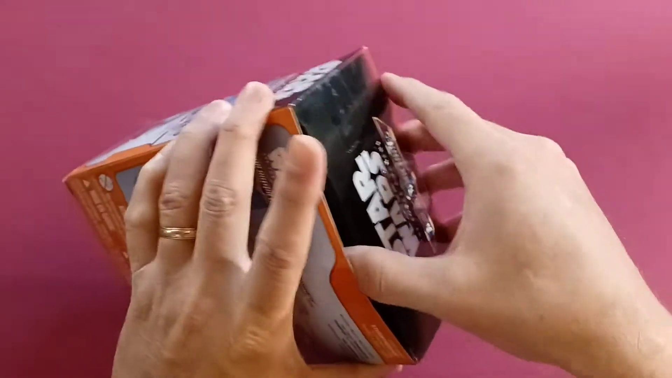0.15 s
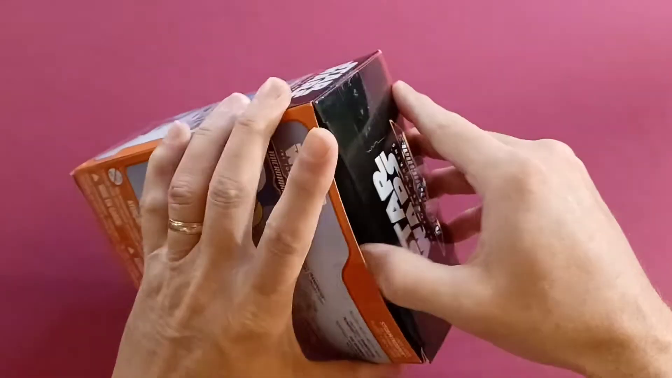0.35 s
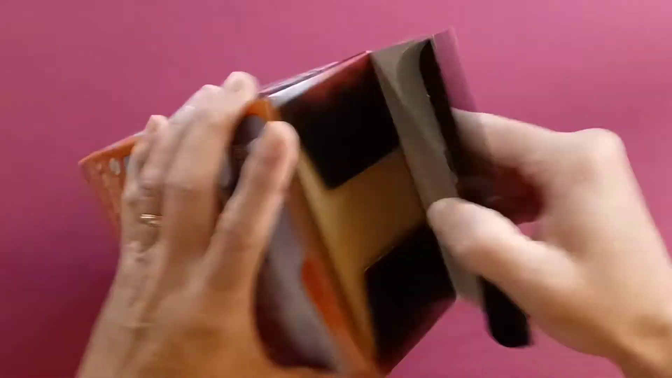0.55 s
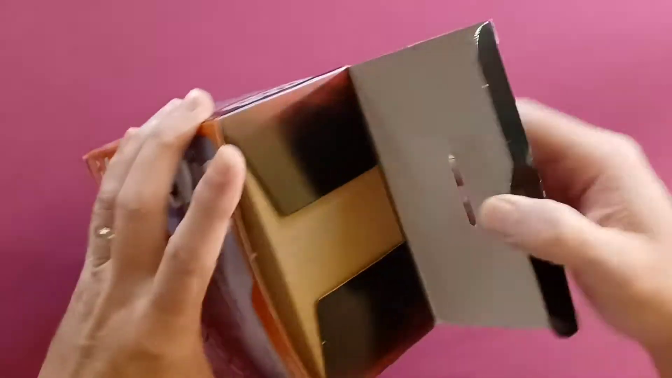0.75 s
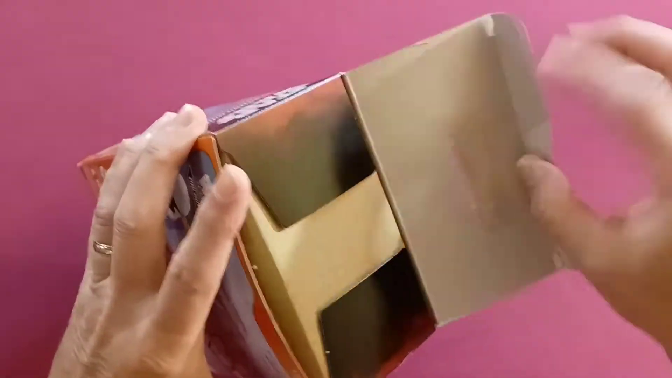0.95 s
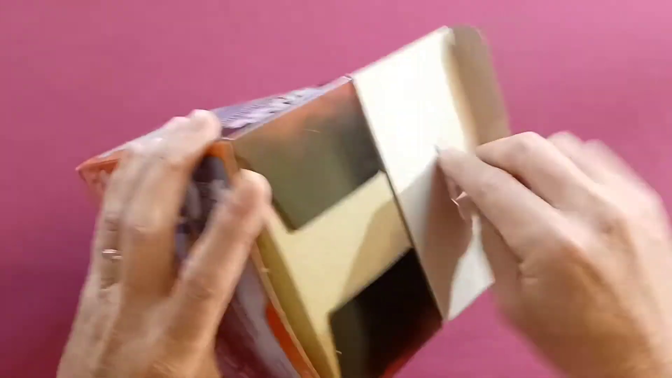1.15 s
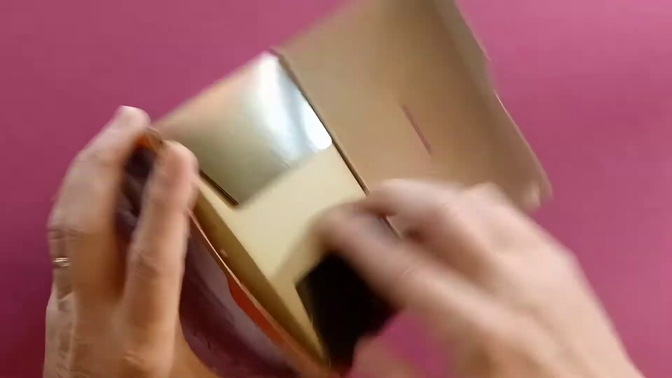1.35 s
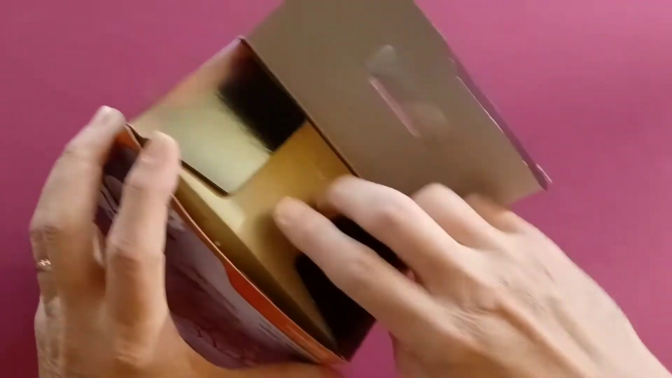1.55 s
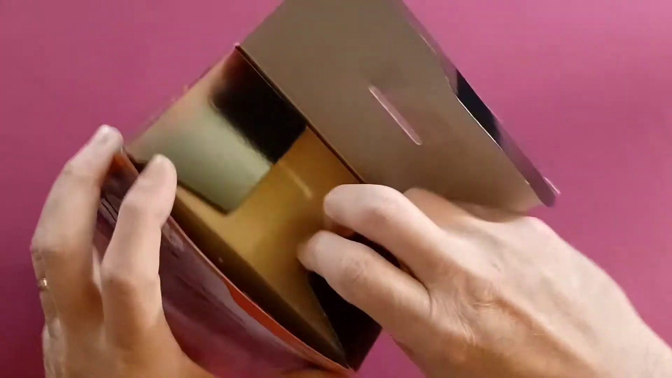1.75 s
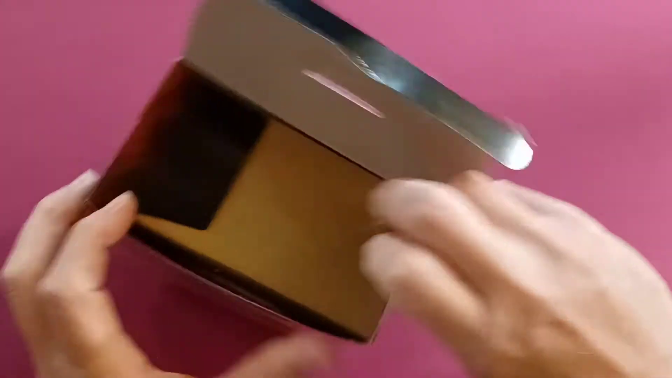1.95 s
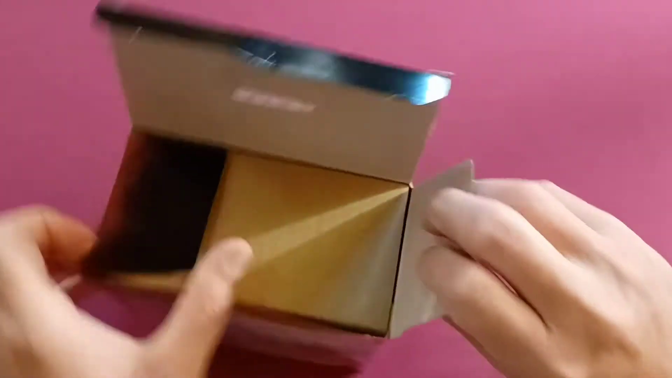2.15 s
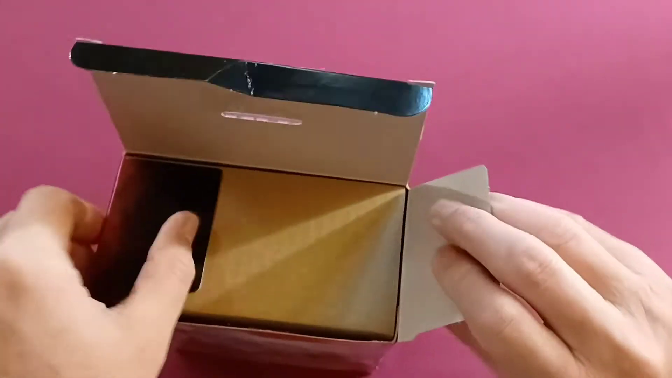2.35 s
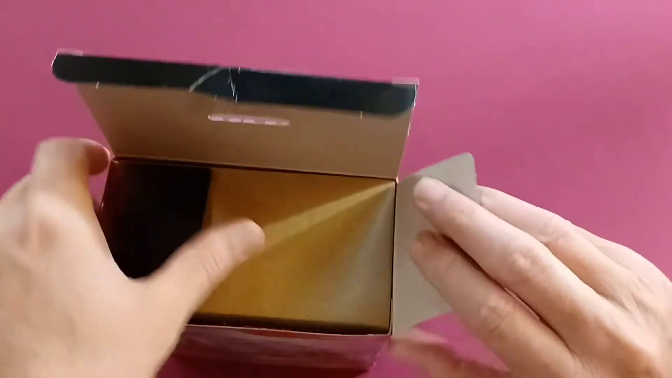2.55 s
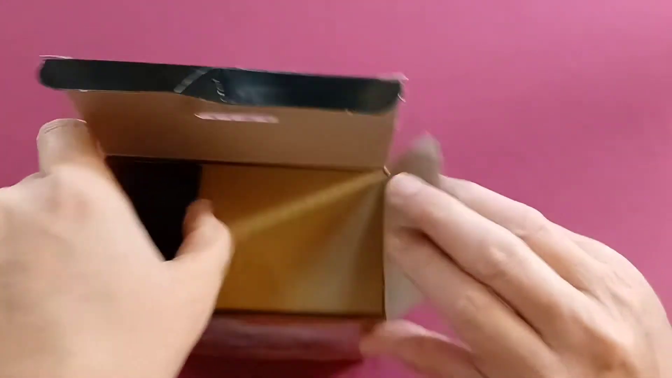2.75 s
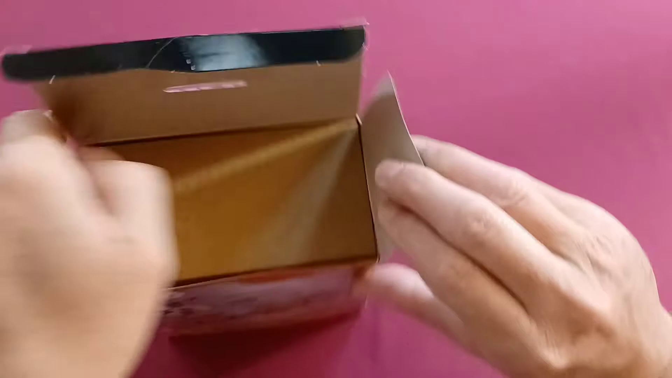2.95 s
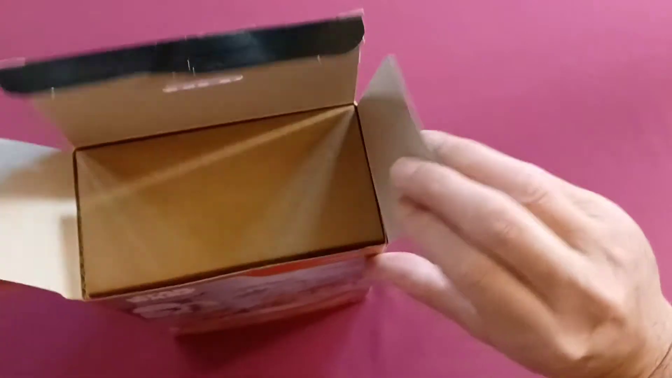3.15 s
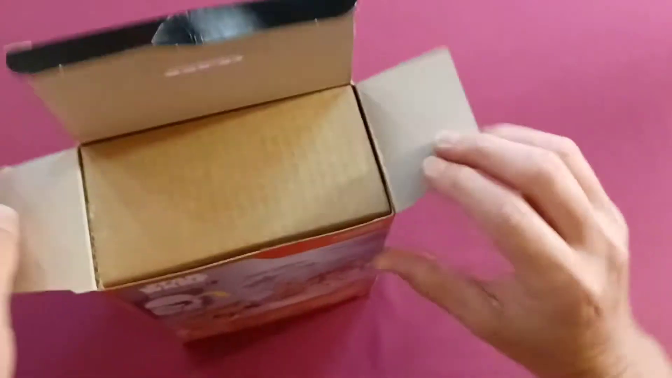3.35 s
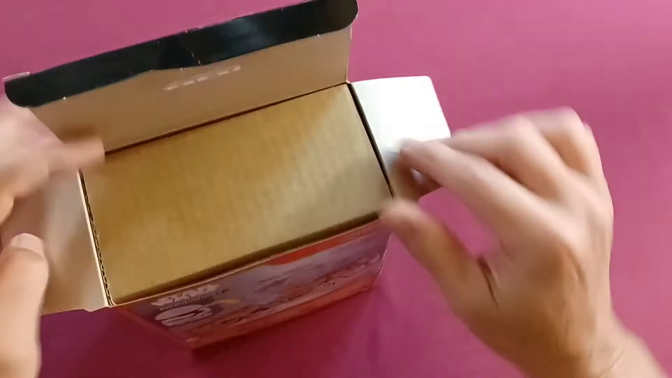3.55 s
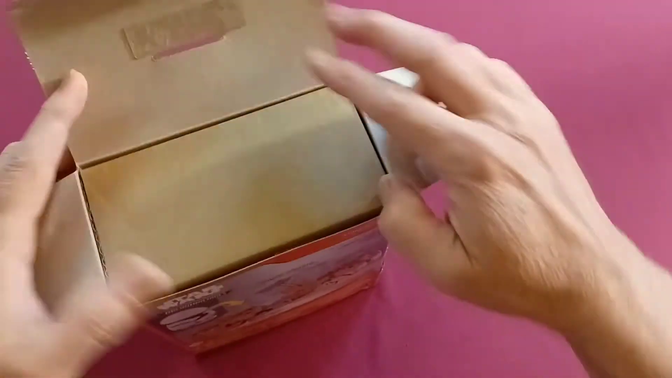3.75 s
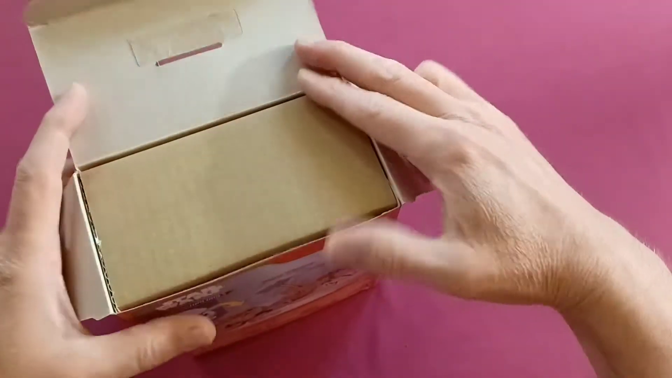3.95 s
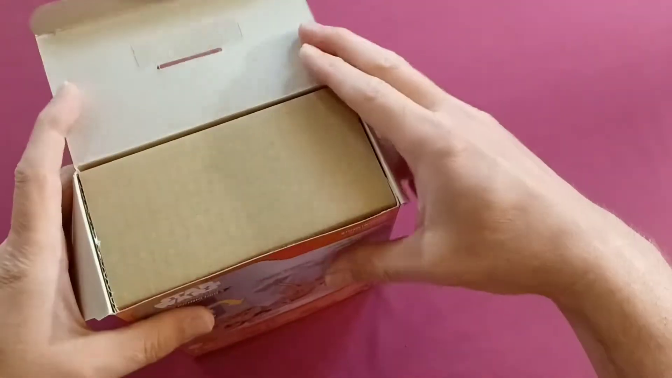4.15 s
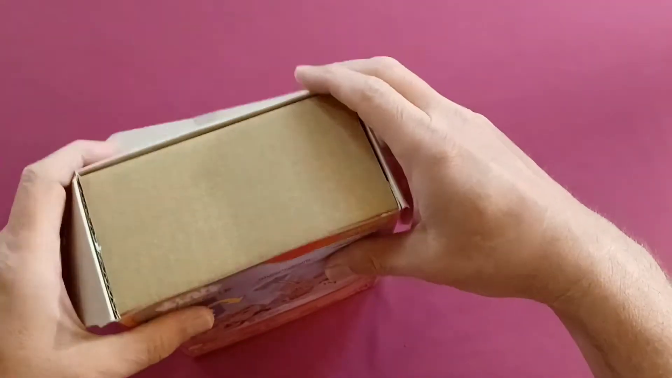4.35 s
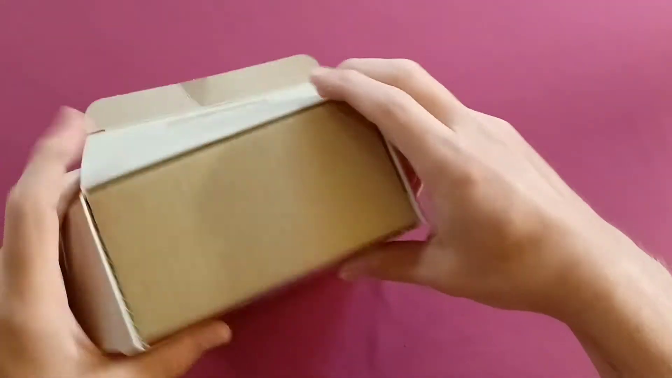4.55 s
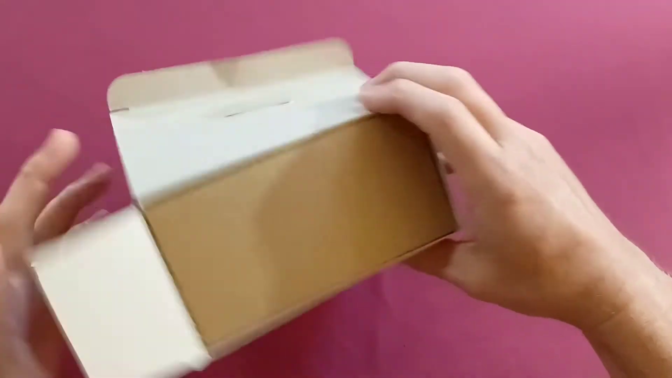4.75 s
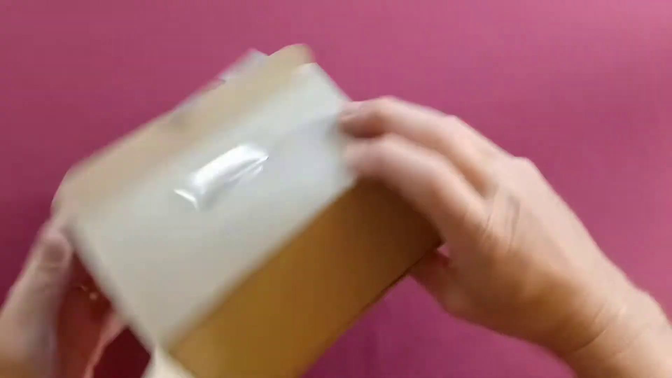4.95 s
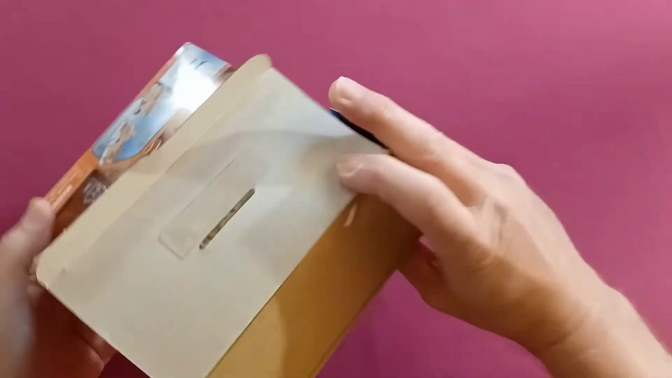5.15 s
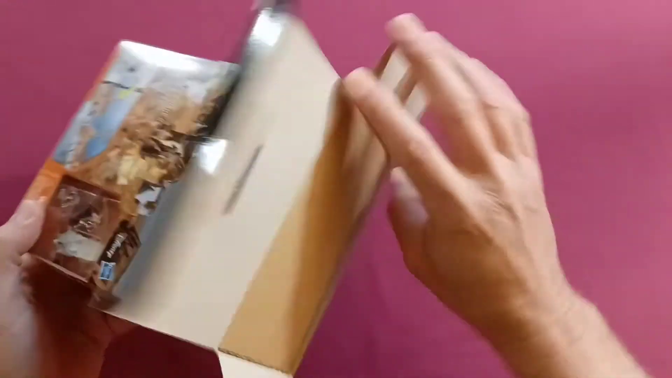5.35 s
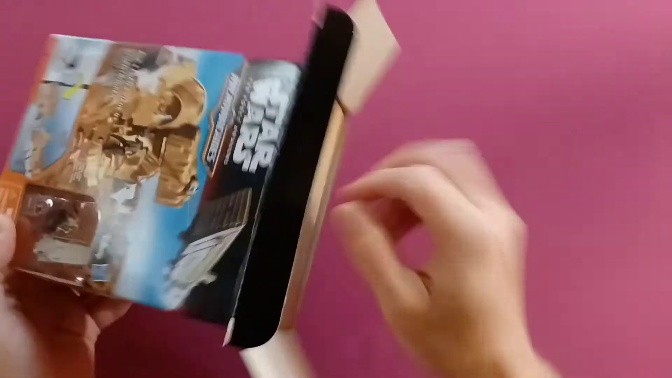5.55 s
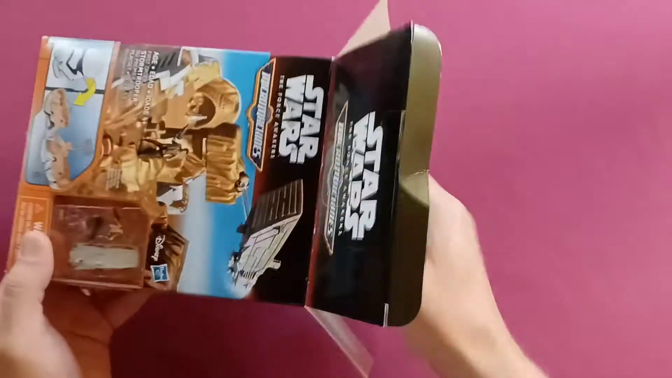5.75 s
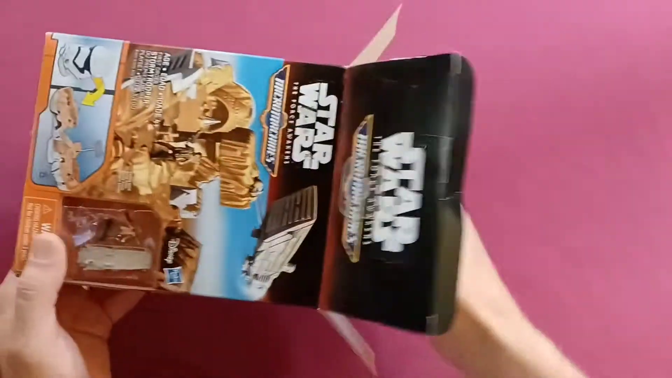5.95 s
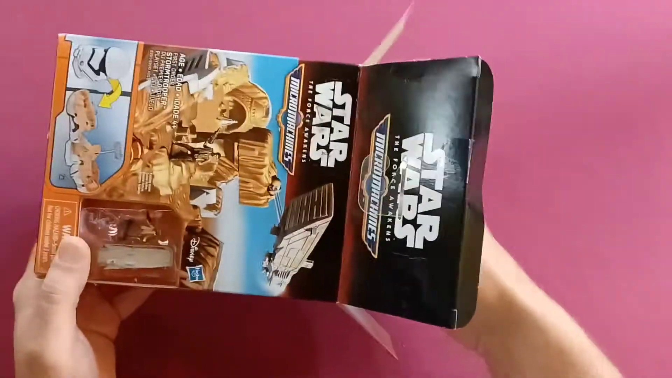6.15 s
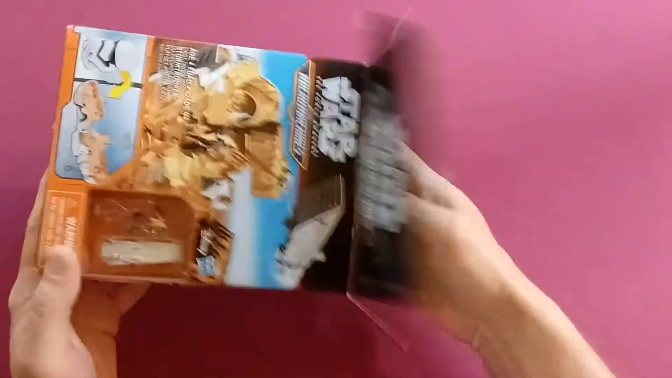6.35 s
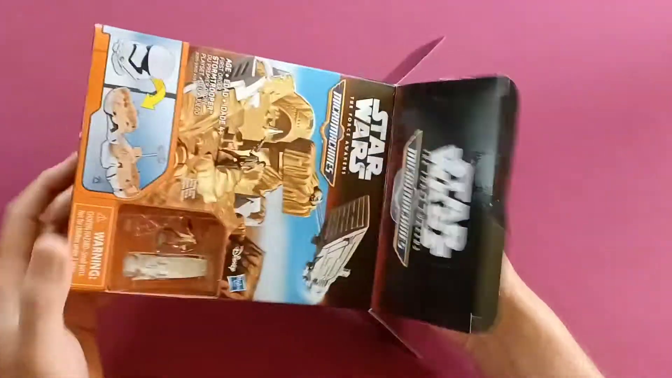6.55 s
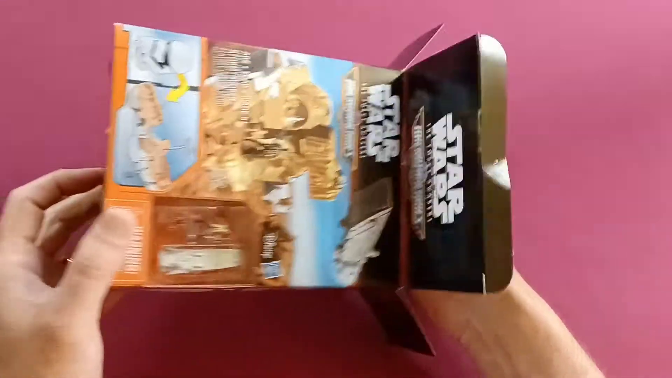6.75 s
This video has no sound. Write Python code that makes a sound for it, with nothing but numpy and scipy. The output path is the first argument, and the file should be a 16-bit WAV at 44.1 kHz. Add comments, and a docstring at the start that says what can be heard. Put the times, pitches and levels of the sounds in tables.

```python
"""A faint touch, then a hard snap of card: a paperboard box unfolds and turns in two hands on a table.
A two-port microphone stands close by in a quiet room; the working hand drifts across it.
Flaps snap, tap and thud: noise bursts excite the hollow box, a flap at its own pitch and a bright crack.
Card edges scrape and fingertips hiss over the gloss: stick-slip noise drives resonances and a treble band.
The box booms when jolted on the table; faint room tone and microphone hiss lie beneath."""
import sys
import numpy as np
from scipy import signal
from scipy.fft import rfft, irfft, next_fast_len
from scipy.io import wavfile
from scipy.ndimage import map_coordinates

SR = 44100
rng = np.random.default_rng(int(sys.argv[2]) if len(sys.argv) > 2 else 0)


def wav_record(signal):
    """Record a signal, one row per channel, as 16-bit PCM in the file named by sys.argv[1]."""
    frames = np.transpose(np.atleast_2d(signal))
    bounded = np.clip(frames, -1, 1)
    # unit amplitude maps onto the largest positive 16-bit level
    quanta = np.round(bounded * 32767).astype(np.int16)
    wavfile.write(sys.argv[1], SR, quanta)


N = 303408

# Room tone and microphone hiss. Each row: frequency in Hz, relative spectral level in dB.
QUIET_SPECTRUM = [(24, -35), (40, 4), (412, -7), (790, -9.5), (918, -19.5), (2500, -19.5), (8550, -20.5),
                  (9450, -28), (13100, -36), (16000, -31.5)]
# Decay of the room. Each row: frequency in Hz, time to fall by 60 dB in seconds.
ROOM_DECAY = [(200, 0.16), (1000, 0.14), (4000, 0.066), (12000, 0.048)]
# Sound that reaches the ports by separate paths. Each row: frequency in Hz, gain in dB re the shared sound.
SCATTER = [(60, 4), (130, -2.5), (350, -12.5), (1200, 0.5), (4000, 4.5), (12000, 3.5)]
# The working hand moves across the microphone. Each row: time in seconds, lead of the left port in samples.
HAND_LEAD = [(0, 2.4), (1.3, 2.5), (1.8, 4.2), (2.7, 6.4), (3.2, 10), (3.7, 3.1), (4.3, 2.5), (4.7, 9),
             (5.2, 2.9), (6.0, 0.8), (6.88, 0.33)]
# The whole box on the table. Each row: frequency in Hz, width in Hz, gain in dB.
TABLE_BOOM = [(110, 120, 0)]
# Jolts of the box against the table. Each row: start in seconds, peak before panning in dB.
JOLTS = [(0.492, -23), (0.513, -23.5), (0.575, -30), (0.964, -33.5), (1.064, -39), (1.236, -48),
         (1.632, -38.5), (2.23, -44), (3.267, -47.5), (4.35, -48), (5.683, -35), (6.426, -48)]
# Walls and air of the box, as rubbed; taps vary them. Each row: frequency in Hz, width in Hz, gain in dB.
BOX_MODES = [(107, 34, -8), (233.5, 40, 0.5), (292.7, 18, 2), (411.7, 31.4, 4), (540.7, 52, -3),
             (652.6, 65, -3)]
# Flaps and edges, as rubbed; taps widen them. Each row: frequency in Hz, width in Hz, gain in dB.
CARD_MODES = [(869, 34, 2.5), (937.6, 43, 5.5), (1007, 100, 2), (1284, 96, 0.5), (1500, 67, -4.5),
              (1940, 560, -12), (2300, 230, -6), (2480, 110, 0), (2990, 610, -2.5), (3650, 670, -11),
              (4860, 500, -7), (5278, 270, -7)]
# Fingertips on the glossy print. Each row: frequency in Hz, relative spectral level in dB.
GLOSS_SPECTRUM = [(2500, -38.5), (4000, 3), (5500, -3), (7000, 0), (9000, -7), (11000, -2), (13000, 0.5),
                  (16000, -5)]
# Hands shifting on the box between strokes. Each row: time in seconds, card edge level in dB.
RESTING_HANDS = [(0, -81), (0.3, -74.5), (0.6, -74.5), (0.71, -81.5), (0.94, -83.5), (1.2, -64.5),
                 (1.84, -62.5), (2.5, -69.5), (3.08, -64.5), (3.31, -67.5), (3.52, -72), (3.73, -62),
                 (4.1, -70.5), (4.6, -72), (4.82, -79.5), (4.95, -69.5), (5.27, -71.5), (5.46, -86.5),
                 (5.62, -93), (5.79, -71), (6.3, -68), (6.88, -71)]
# Strokes of hand or flap over card, and the rustle that dies away after some taps.
# Each row: start in seconds, hold in seconds, swell before the start in seconds, card edge level in dB,
# hollow box in dB re edges, fingertip hiss in dB re edges, flap pitch in Hz.
STROKES = [(0, 0.04, 0.02, -63, 9, -6.5, 860.0), (0.061, 0.029, 0.018, -70, 10.5, -13, 896),
           (0.18, 0.016, 0.027, -71.5, 7, -3.5, 1023), (0.241, 0.013, 0.024, -55.5, 4, -19, 2274),
           (0.369, 0.09, 0.08, -46.5, -3, -19, 1700), (0.472, 0.016, 0.03, -37.5, 1.5, -11, 1751),
           (0.49, 0.025, 0.0065, -26, -6, -12, 1790), (0.534, 0.033, 0.018, -38.5, 0.5, -9.5, 1550.0),
           (0.685, 0.09, 0.026, -78, -2, 5.5, 3190.0), (0.959, 0.02, 0.005, -55, 9.5, -6, 2800),
           (1.07, 0.022, 0.005, -62, 7, -13.5, 3000), (1.094, 0.023, 0.055, -55.5, 4, -18.5, 3100),
           (1.191, 0.039, 0.01, -51.5, 2.5, -22, 1204), (1.231, 0.055, 0.03, -44.5, -1, -9.5, 1490.0),
           (1.307, 0.05, 0.025, -42.5, -6.5, -10, 1443), (1.353, 0.078, 0.034, -49, -7, 1.5, 939),
           (1.458, 0.028, 0.02, -58.5, -7.5, -6.5, 3173), (1.608, 0.013, 0.03, -60, -4.5, 0.5, 883),
           (1.662, 0.02, 0.05, -45, -1.5, -8.5, 1080.0), (1.713, 0.078, 0.022, -54.5, -5, -24.5, 970.0),
           (1.81, 0.045, 0.036, -65.5, 10.5, -2, 930.0), (1.92, 0.015, 0.006, -53, 6.5, -15.5, 2135),
           (2.076, 0.12, 0.04, -60, 5, -5, 860.0), (2.197, 0.041, 0.025, -50.5, 8, -5.5, 906),
           (2.29, 0.066, 0.06, -45.5, -1.5, -9.5, 921), (2.406, 0.022, 0.02, -59.5, -3.5, -2.0, 881),
           (2.497, 0.021, 0.005, -57.5, -3, -2, 976), (2.574, 0.04, 0.012, -51, -17.5, -7, 1062),
           (2.613, 0.02, 0.04, -45, -18.5, -8.5, 951.4), (2.667, 0.024, 0.02, -55, -3, -20, 939),
           (2.755, 0.041, 0.03, -52.5, -6, -11, 970.0), (2.849, 0.13, 0.063, -59.5, 3, -6.0, 1340.0),
           (3.003, 0.04, 0.03, -63, 9.5, -5.5, 3166), (3.068, 0.051, 0.07, -49, -1, -8, 1009),
           (3.17, 0.044, 0.03, -58, -7.0, 6, 2803), (3.264, 0.011, 0.0086, -55.5, 10.5, -0.5, 2934),
           (3.573, 0.02, 0.03, -55.5, 6.5, -15.5, 1197), (3.596, 0.033, 0.012, -47, 1.5, -7, 1353),
           (3.632, 0.05, 0.033, -52.5, 8, -7, 2400), (3.682, 0.021, 0.033, -54.5, 3, -7, 3600),
           (3.728, 0.045, 0.03, -60, 11.5, -8.5, 2600), (3.854, 0.038, 0.02, -52, 5, -9, 989),
           (3.931, 0.04, 0.068, -50.5, -2.5, -7, 1050), (4.209, 0.045, 0.18, -60.5, -3, -2.5, 1005),
           (4.283, 0.06, 0.012, -66, -1.5, 4.5, 2594), (4.35, 0.025, 0.0084, -48, 1.5, -26, 1022),
           (4.428, 0.048, 0.03, -65.5, -2, -0.5, 1492), (4.571, 0.063, 0.038, -62.5, 4.5, 0.5, 2850),
           (4.661, 0.054, 0.059, -48, 0, -10.5, 959), (4.703, 0.0083, 0.015, -44, 1, -5.5, 2776),
           (4.991, 0.034, 0.012, -59, 4.5, -14, 943), (5.06, 0.022, 0.0092, -65.5, -2, -8.5, 957),
           (5.21, 0.043, 0.06, -69.5, 14.5, -7, 944), (5.276, 0.03, 0.039, -62.5, 9.5, 5, 3016),
           (5.392, 0.013, 0.047, -60, 3.5, -2, 2440), (5.61, 0.035, 0.0055, -47, 1.5, -15.5, 946),
           (5.659, 0.051, 0.02, -46.5, -5.5, -19, 975), (5.729, 0.03, 0.055, -41.5, -3.5, -12.5, 1200),
           (5.752, 0.028, 0.027, -50, 3.5, -9.5, 2600), (5.857, 0.05, 0.033, -62, -8.5, -10.5, 2520),
           (5.972, 0.06, 0.01, -57.5, -1.5, -10.5, 957), (6.062, 0.034, 0.033, -57, 4.5, -9, 2355),
           (6.202, 0.025, 0.055, -52.5, -1.5, -5.5, 1870.0), (6.247, 0.02, 0.01, -55.5, 1.5, -6, 1288),
           (6.39, 0.03, 0.05, -53, -0.5, -5.5, 2466), (6.434, 0.017, 0.011, -47.5, 1.5, -21.5, 866),
           (6.532, 0.02, 0.047, -57.5, 3.5, -7.5, 1955), (6.73, 0.031, 0.082, -58.5, 4, -10.5, 1402),
           (6.869, 0.02, 0.024, -55, 0, -3.5, 1410)]
# Snaps and taps. Each row: start in seconds, card ring peak before panning in dB, thud in dB re card,
# crack in dB re card, card pitch in Hz.
TAPS = [(0.031, -48, -17, -7, 614), (0.157, -60, -20, 14, 3070), (0.172, -53, -6, 9, 1090),
        (0.237, -40.5, -16, -10.5, 2320), (0.324, -43, -27, -8, 2400), (0.485, -7.5, -9.5, -1.5, 1710),
        (0.491, -7.5, -6, -9, 1754), (0.502, -15, -22, -2, 787), (0.508, -5, -11, -1, 2250),
        (0.513, -12, -6, -8, 3850), (0.576, -27, -11, -9.5, 1560), (1.843, -48.5, 3, -14, 1000),
        (0.959, -32.5, -5, -14, 812), (0.965, -31.5, -21.5, -5.5, 2740), (1.065, -46.5, -16, -3, 566),
        (1.177, -33.5, -14, -8.5, 2760), (1.192, -30, -1.5, -26.5, 575), (1.239, -26.5, -1, -23.5, 810),
        (1.25, -36.5, -9, -15.5, 1420), (1.276, -25.5, -4, -20.5, 616), (1.305, -30, -34, -11, 2642),
        (1.327, -31, -14, -14, 1250), (1.383, -35.5, 0, -9.5, 690), (1.406, -36, -23, -9, 2470),
        (1.485, -22, -26.5, 1.5, 3190), (1.586, -48.5, -11, -12.5, 960), (1.601, -36, -9, -11, 890),
        (1.633, -40.5, 5, -9.5, 1040), (1.661, -28, -11.5, -3, 1230), (1.92, -30, -14, -19.5, 695),
        (1.924, -31, -28, -18.5, 2210), (1.946, -48.5, -10, 6.5, 3570), (2.185, -50, 7, -13, 690),
        (2.232, -30, -33, 8.5, 824), (2.339, -23.5, -22, -18.5, 903), (2.493, -35, -16, -9.5, 950),
        (2.568, -49, -12, -8, 1020), (2.628, -29.5, -19, -7.5, 1040), (2.639, -27, -17.5, -3.5, 1290),
        (3.084, -35, -6, -16.5, 644), (3.102, -40, -24, 6, 1040), (3.261, -27.5, -9, -6, 2650),
        (3.267, -30, -2.5, 4.5, 3040), (3.593, -34.5, -13, 9, 660), (3.629, -41.5, 9.5, -18, 520),
        (3.656, -35.5, 1.5, -7, 2400), (3.666, -40, -8, -15, 490), (3.727, -39.5, -21, -9.5, 3950),
        (3.746, -43, 5, -16, 766), (3.872, -37, -13, -4, 1050), (3.957, -36.5, -3, -0.5, 1107),
        (4.22, -53.5, -8, 17.5, 1110), (4.283, -52, -9, 19.5, 670), (4.317, -34, -26, -9.5, 2670),
        (4.352, -28.5, 2, -28, 950), (4.358, -31.5, 1.5, -22.5, 1040), (4.462, -50.5, -10, 15, 4450),
        (4.594, -48, 6, -2, 1366), (4.67, -31, 2, -9, 2900), (4.701, -30, -10, -18, 1330),
        (4.705, -20.5, -11, -10.5, 2806), (4.998, -49, -14.5, 0, 746), (5.065, -58, -20, 11, 3020),
        (5.29, -45.5, -21, -8, 2930), (5.302, -37.5, -22, 0, 2890), (5.4, -39, -14, -8, 4300),
        (5.61, -32, -6.5, -13, 920), (5.621, -22, -12, -10, 920), (5.682, -41, 4, -12.5, 1020),
        (5.74, -33.5, -15, -11.5, 1140), (5.754, -35.5, 3.5, -14, 806), (5.879, -45.5, -17, 8, 2860),
        (5.966, -50, 1, -7, 810), (6.012, -55, 10.5, -18, 600), (6.066, -55, -1, -10, 700),
        (6.14, -55, 7.5, -16, 600), (6.195, -41, -6, -4, 4200), (6.247, -39, -12, -5.5, 794),
        (6.425, -33.5, 5.5, -23, 760), (6.744, -42.5, 3.5, -11, 596)]

QUIET_DB = -77
TOP_HZ = 15900
SWELL_DB, RELEASE_DB_PER_S = 23.5, 382.5  # depth one swell time before the start; fall after the hold
REST_BOX_DB, REST_HISS_DB, REST_HZ = 3.5, -4, 1080  # box and hiss re edges; flap pitch at rest
MODE_STEP_S = 0.0006  # each card mode is reached by a longer path than the one below it
BLOW = 13  # height of the first blow over its unit-level rattle
RING_T60_S, CRACK_T60_S = 0.014, 0.007  # life of the rattle that feeds the ring and the crack
TAP_BOOM_DB = -25  # table boom of a tap re its thud
ECHO_DB = -5.5  # answer of table and walls
TAP_PAN_DB, TAP_PAN_SPREAD_DB = -0.6, 1.6  # left over right: centre and random spread of the taps


def amp(db):
    """Decibels to an amplitude factor."""
    return 10 ** (np.asarray(db) / 20)


def unit(x):
    """Scale to an RMS of one."""
    return x / np.sqrt(np.mean(x ** 2) + 1e-20)


def peak(x):
    """Scale to a peak of one."""
    return x / np.max(np.abs(x))


def along(points, hz):
    """Read (Hz, value) points on a log-frequency axis."""
    f, value = np.transpose(points)
    return np.interp(np.log(hz + 1), np.log(f + 1), value)


def wobble(rate):
    """A smooth random curve with rate knots a second."""
    knots = rng.standard_normal(int(N * rate / SR) + 4)
    return map_coordinates(knots, [np.arange(N) * rate / SR])


def filtered(x, response):
    """Apply a complex response of frequency, padded so that ringing does not wrap round."""
    n = x.shape[-1]
    padded = next_fast_len(n + 8192)
    spectrum = rfft(x, padded) * response(np.fft.rfftfreq(padded, 1 / SR))
    return irfft(spectrum, padded)[..., :n]


def ringing(modes):
    """The causal response of (Hz, width, dB) resonances, summed with alternating sign."""
    def response(f):
        return sum((-1) ** k * amp(db) * 1j * f * width / (c * c - f * f + 1j * f * width)
                   for k, (c, width, db) in enumerate(modes))
    return response


def ports(x, lead, pan_db):
    """A still source: the left port hears it lead samples before the right and pan_db louder."""
    def turn(hz):
        return np.exp(1j * np.pi * hz * lead / SR * np.array([[1], [-1]]))
    return filtered(x, turn) * amp(np.array([[0.5], [-0.5]]) * pan_db)


def moving(x, pan_db):
    """A source whose lead between the ports changes as the hand moves."""
    half_lead = np.interp(np.arange(N) / SR, *np.transpose(HAND_LEAD)) / 2
    heard = []
    for side in (1, -1):
        delayed = map_coordinates(x, [np.arange(N) + side * half_lead], order=5)
        heard.append(delayed * amp(side * pan_db / 2))
    return np.array(heard)


def quiet():
    """Room tone and microphone hiss: steady shaped noise, partly shared by both ports."""
    noise = rng.standard_normal((2, N)) + 0.58 * rng.standard_normal(N)
    return amp(QUIET_DB) * unit(filtered(noise, lambda hz: amp(along(QUIET_SPECTRUM, hz))))


def jolts():
    """The whole box booms briefly on the table top: a short push through a low resonance taken twice."""
    out = np.zeros(N + SR)
    t = np.arange(SR // 4) / SR
    for start, db in JOLTS:
        push = rng.standard_normal(len(t)) * amp(-60 * t / 0.0075)
        push[8] += 6  # the blow itself leads
        boom = peak(filtered(push, lambda f: ringing(TABLE_BOOM)(f) ** 2))
        out[round(start * SR):][:len(t)] += amp(db) * boom
    return ports(out[:N], lead=4, pan_db=2.0)


def strokes():
    """Strokes and tap rustles swell, hold and die over the resting hands; the strongest weighs most in pitch."""
    t = np.arange(0, N + 64, 64) / SR
    start, hold, swell, db, box_db, hiss_db, hz = np.transpose(STROKES)[..., None]
    before = np.maximum(start - t, 0) / np.maximum(swell, 1 / 200)
    after = np.maximum(t - start - hold, 0)
    edge_db = db - SWELL_DB * before - RELEASE_DB_PER_S * after
    rest_db = np.interp(t, *np.transpose(RESTING_HANDS))

    def total(stroke_re_db, rest_re_db):
        power = np.sum(amp(edge_db + stroke_re_db) ** 2, axis=0) + amp(rest_db + rest_re_db) ** 2
        return np.sqrt(power)

    edges = total(0, 0)
    log_pitch = np.sum(amp(edge_db) ** 2 * np.log(hz), axis=0) + amp(rest_db) ** 2 * np.log(REST_HZ)
    pitch = np.exp(log_pitch / edges ** 2)
    curves = (total(box_db, REST_BOX_DB), edges, total(hiss_db, REST_HISS_DB), pitch)
    return [np.interp(np.arange(N) / SR, t, curve) for curve in curves]


def slips(rate, spread_db, smooth):
    """Stick-slip friction for three paths: shared times and sizes of catches, on beds of fine noise."""
    size_db = spread_db * np.minimum(rng.exponential(size=N), 3)  # uneven but bounded
    caught = rng.random(N) < rate / SR
    catches = caught * amp(size_db) * rng.standard_normal((3, N))
    return unit(catches) + smooth * rng.standard_normal((3, N))


def rubbing():
    """Friction shakes the hollow box, the card edges and the gloss; the ports share part of it."""
    box_gain, edge_gain, hiss_gain, flap_hz = strokes()
    grip_db = 1.3 * wobble(40) + 2.2 * wobble(100)  # the grip stutters
    # modes near the flap's pitch ring most: 11 dB less per octave away
    favour = [amp(-11 * np.abs(np.log2(flap_hz / c)) + 3.5 * wobble(16)) for c, _, _ in CARD_MODES]
    even = np.sqrt(sum(g ** 2 for g in favour))

    def card_paths(f):
        return np.array([ringing([mode])(f) * np.exp(-2j * np.pi * f * k * MODE_STEP_S)
                         for k, mode in enumerate(CARD_MODES)])

    layers = []
    for force in slips(rate=800, spread_db=3, smooth=1.2):
        box_force = force * amp(0.2 * grip_db + 4.9 * wobble(30))
        box = unit(filtered(box_force, ringing(BOX_MODES)))
        modes = filtered(force * amp(grip_db), card_paths)
        edge = unit(sum(g / even * mode for g, mode in zip(favour, modes)))
        skin = force + 1.5 * rng.standard_normal(N)  # skin slides more evenly than card
        skin = skin * amp(0.68 * grip_db + 1.1 * wobble(90))
        hiss = unit(filtered(skin, lambda hz: amp(along(GLOSS_SPECTRUM, hz))))
        layers.append(box_gain * box + edge_gain * edge + hiss_gain * hiss)
    shared = layers[0]
    apart = filtered(np.array(layers[1:]), lambda hz: amp(along(SCATTER, hz)))
    both = moving(shared, pan_db=1.2) + apart
    # the mean of the two ports keeps the power of the shared layer
    return both * np.sqrt(np.mean(shared ** 2) / np.mean(both.mean(axis=0) ** 2))


def tail(length):
    """Two fresh room tails: each frequency dies at its own speed, the low mids near 350 Hz most alike."""
    hz, t, z = signal.stft(rng.standard_normal((3, length)), SR, nperseg=256)
    pair = z[0] + z[1:] * amp(along(SCATTER, hz))[:, None]
    decay = amp(-60 * t / along(ROOM_DECAY, hz)[:, None])
    out = signal.istft(pair * decay, SR, nperseg=256)[1]
    return out / np.linalg.norm(out[0])


def taps():
    """A blow with a short rattle thuds in the box, rings the flap at its own pitch and cracks in the treble."""
    out = np.zeros((2, N + SR))
    t = np.arange(SR // 4) / SR
    crack_modes = [(3800, 1800, -1.0), (7600, 10000, 0), (12700, 1700, 2)]  # Hz, width in Hz, dB
    luck = rng.standard_normal((len(TAPS), 16))
    for (start, db, thud_db, crack_db, hz), chance in zip(TAPS, luck):
        rattle = rng.standard_normal(len(t))
        rattle[8] += BLOW  # the blow itself leads the rattle

        def dying(t60):
            return rattle * amp(-60 * t / t60)

        # every contact finds the walls and the flap a little different
        walls = [(c * (1 + 0.043 * u), width, g + 3 * v)
                 for (c, width, g), u, v in zip(BOX_MODES[1:], chance, chance[::-1])]
        flap = [(hz, 0.083 * hz, 0)]
        flap += [(c, 3.8 * width, g - 4 - 6.1 * abs(np.log2(c / hz)) + 3 * u)
                 for (c, width, g), u in zip(CARD_MODES, chance)]
        boom = peak(filtered(dying(0.011), lambda f: ringing(TABLE_BOOM)(f) ** 2))
        thud = peak(filtered(dying(0.012), lambda f: ringing(walls)(f) / (1 + 1j * f / 900)))
        ring = peak(filtered(dying(RING_T60_S), lambda f: ringing(flap)(f) / (1 + 1j * f / (4 * hz))))
        crack = peak(filtered(dying(CRACK_T60_S), ringing(crack_modes)))
        hollow = amp(thud_db) * (thud + amp(TAP_BOOM_DB) * boom)
        near = amp(db) * (hollow + ring + amp(crack_db) * crack)
        echo = signal.fftconvolve(near[None], tail(SR // 4), axes=1)
        lead = np.interp(start, *np.transpose(HAND_LEAD)) + 3.3 * chance[-1]
        pan_db = TAP_PAN_DB + TAP_PAN_SPREAD_DB * chance[-2]
        at = round(start * SR)
        out[:, at:at + len(t)] += ports(near, lead, pan_db)
        # table and walls answer 60 samples later
        out[:, at + 60:at + 60 + echo.shape[1]] += amp(ECHO_DB) * echo
    return out[:, :N]


def scene():
    """Room floor, table booms, rubbing hands and the taps of the card, together at the two ports."""
    return quiet() + jolts() + rubbing() + taps()


def record(dry):
    """The microphone loses deep bass, in three gentle steps at 60 Hz, and keeps nothing above its band."""
    return filtered(dry, lambda hz: (1j * hz / (1j * hz + 60)) ** 3 * (hz < TOP_HZ))


dry = scene()
out = record(dry)
wav_record(out)
```